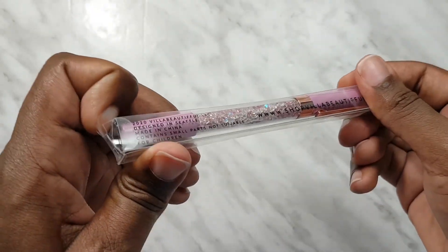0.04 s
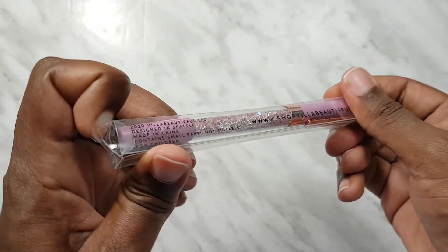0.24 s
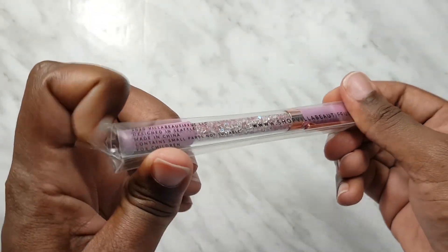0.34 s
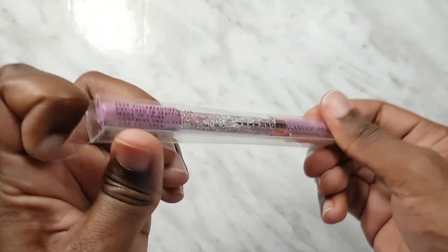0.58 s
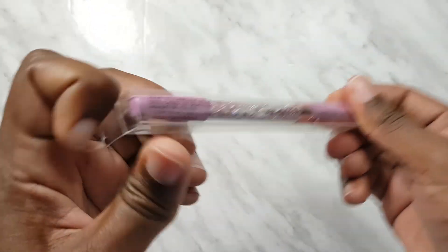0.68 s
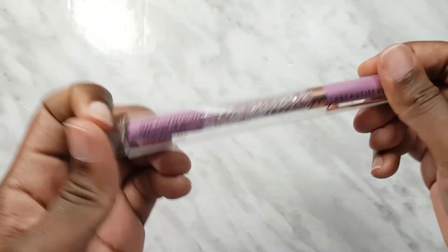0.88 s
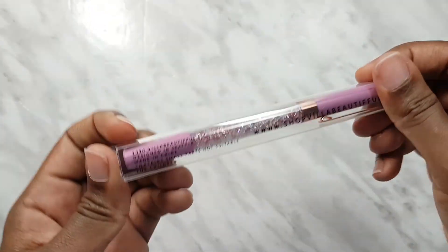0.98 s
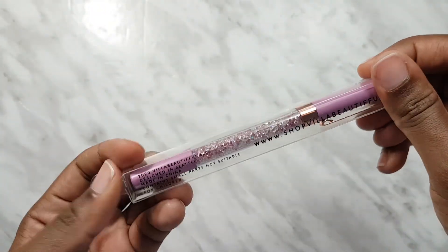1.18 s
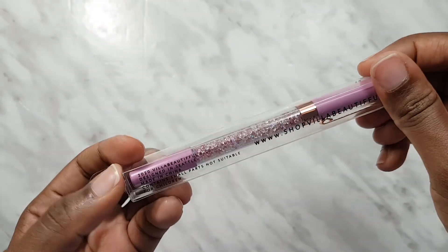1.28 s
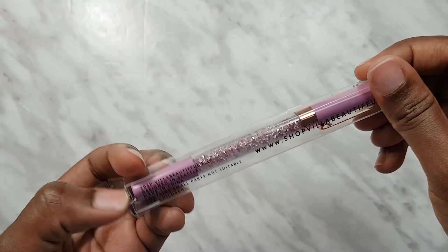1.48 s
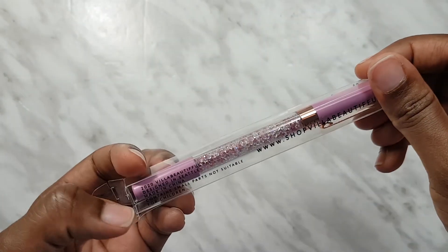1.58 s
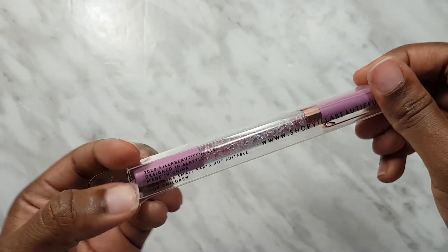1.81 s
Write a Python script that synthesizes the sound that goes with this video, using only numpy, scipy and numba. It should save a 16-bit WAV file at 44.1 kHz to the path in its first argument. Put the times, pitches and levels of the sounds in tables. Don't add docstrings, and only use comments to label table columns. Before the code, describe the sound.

Thin clear plastic pen box clicks sharply, its flap buckling and snapping free with a brief rattle

```python
import sys
import numpy as np
from scipy import signal
from scipy.fft import rfft, irfft
from scipy.io import wavfile
from scipy.ndimage import uniform_filter1d
from numba import njit

SR = 44100
rng = np.random.default_rng(int(sys.argv[2]) if len(sys.argv) > 2 else 0)


def ratio_of_db(decibels):
    return 10 ** (np.asarray(decibels, float) / 20)


def wav_out(sig):
    wavfile.write(sys.argv[1], SR, np.round(np.clip(np.atleast_2d(sig).T, -1, 1) * 32767).astype(np.int16))


N = 81585
PORT_LAG_S = 0.00016
LEFT_RIGHT = np.array([[0.5], [-0.5]])
BASS_PAN_DB = 4
ROOM_T60_S = 0.29


def unit(x):
    return x / np.sqrt(np.mean(x ** 2))


@njit
def svf(x, hz, width):
    y, band, low = np.empty(len(x)), 0., 0.
    for i in range(len(x)):
        g = np.tan(np.pi * hz[i] / SR)
        v = (band + g * (x[i] - low)) / (1 + g * (g + width))
        band, low = 2 * v - band, low + 2 * g * v
        y[i] = width * v
    return y


def noise_band(hz, width):
    return svf(rng.standard_normal(N), np.full(N, 1. * hz), width)


def walk(rate_hz):
    hold = int(SR / rate_hz)
    steps = np.repeat(rng.standard_normal(N // hold + 1), hold)
    return 0.33 * uniform_filter1d(uniform_filter1d(steps, hold), hold)[:N]


def add(out, x, start_s):
    for port in range(2):
        i = int((start_s + port * PORT_LAG_S) * SR)
        n = min(x.shape[1], N - i)
        out[port, i:i + n] += x[port, :n]


# frequency in Hz, density in dB per Hz.
HISS_SPECTRUM = [(200, -8.5), (320, -9), (740, -21.5), (2000, -24), (4500, -31.5), (9000, -43.5),
                 (14500, -33), (16000, -41)]
# centre in Hz, width in Hz, level in dB.
HUM_RESONANCES = [(54, 21, -74), (123, 44, -65.5), (137.5, 9.2, -69), (284.9, 43, -71)]
HISS_DB, SHARED_HZ = -66, 1500
DRONE_HZ, DRONE_DB, DRONE_ENDS_S = 480, -70.5, 0.6
EARLIER_CLICK_DB = -56.5


def air():
    t = np.arange(N) / SR
    f = np.maximum(np.arange(N // 2 + 1) * SR / N, 1)
    spectrum_hz, spectrum_db = np.array(HISS_SPECTRUM).T
    density = ratio_of_db(np.interp(np.log(f), np.log(spectrum_hz), spectrum_db))
    mid, side = rfft(rng.standard_normal((2, N))) * density
    side = side * np.clip(0.2 + f / SHARED_HZ, 0, 1)
    hiss = irfft(np.array([mid + side, mid - side]) * (f > 200), N)

    hum = 0
    for hz, width_hz, db in HUM_RESONANCES:
        shared, opposed = (
            svf(noise_band(hz, width_hz / hz), np.full(N, 1. * hz), 0.59) for _ in range(2))
        ports = unit(shared) + 0.24 * unit(opposed) * np.array([[1], [-1]])
        hum = hum + ratio_of_db(db + 2.0 * walk(1.7)) * ports
    drone = unit(noise_band(DRONE_HZ, 0.18)) * np.clip((DRONE_ENDS_S - t) * 10, 0, 1)
    hum = hum + ratio_of_db(DRONE_DB) * drone

    earlier = np.array([unit(noise_band(3000, 0.23)) for _ in range(2)])
    earlier = earlier * ratio_of_db(EARLIER_CLICK_DB - 60 * t / ROOM_T60_S)
    pan = ratio_of_db(LEFT_RIGHT * BASS_PAN_DB)
    hiss = unit(hiss) * ratio_of_db(HISS_DB + 3.1 * walk(10)) * pan ** 0.27
    return hiss + hum * pan + earlier


# frequency in Hz, left-right difference in dB.
PORT_SHADE = [(600, -0.5), (2300, -3), (3300, 0.5), (5000, 0), (8000, 7), (13000, 4.5)]
RISE_S, RADIATES_HZ, SAME_PHASE_HZ = 0.00014, 450, 1100
DETUNE_SHARE, SCATTER_DB, CHATTER_DB = 0.017, 1.17, -9


def ring(modes, lift_db, t, chatter_s):
    hz, db, t60_s = np.array(modes).T
    detune, polarity = rng.standard_normal((2, len(hz)))
    scatter = rng.standard_normal((2, len(hz)))
    spread = np.array([0.04, 1, 1, 1, 1])[:, None, None]
    delay_s = chatter_s * rng.random((5, len(hz), 1)) * spread
    age = np.maximum(t - delay_s, 0)
    waves = np.sin(2 * np.pi * (hz * (1 + DETUNE_SHARE * detune))[:, None] * age)
    waves = waves * ratio_of_db(-60 * age / t60_s[:, None]) * (1 - np.exp(-age / RISE_S))
    shared = waves[0] + ratio_of_db(CHATTER_DB) * (waves[1] - waves[2])
    own = ratio_of_db(CHATTER_DB) * (waves[3] - waves[4])

    shade_hz, shade_db = np.array(PORT_SHADE).T
    shade_db = np.interp(np.log(hz), np.log(shade_hz), shade_db) * LEFT_RIGHT
    gain = ratio_of_db(db + lift_db + shade_db + SCATTER_DB * scatter) * np.sign(polarity)
    phase = np.where(hz < SAME_PHASE_HZ, 1, np.array([[1], [-1]]))
    x = gain @ shared + gain * phase @ own
    return signal.lfilter(*signal.butter(2, RADIATES_HZ, "highpass", fs=SR), x)


# start in seconds, level in dB, low modes in dB, treble crack in dB, left-right in dB.
CLICKS = [
    (0.2266, -14, -3, -19, 8),
    (.2672, -13.5, 3, -16.5, 1.5),
]
BUCKLES = [
    (.3954, -17.5, 1, -3.5, 1.5),
    (.3972, -20, 3, -10, 4.5),
    (.3987, -14.5, -10.5, 1, 4.5),
    (.4010, -22, -4, -1.5, 2.5),
    (.4040, -24, -0.5, -5, 3.5),
    (.4065, -26, 1, -10, 2.5),
    (.4113, -26, -6.5, -4.5, 9),
]
SNAPS = [(.5464, -18.5, -13, 1, 2), (.5498, -11.5, 1, 1, 6.5), (.5520, -16, 0, -10.5, -5),
         (.5542, -17.5, -7, -17.5, 0), (.5572, -26, -0.5, -10.5, 5), (.5620, -23, -1, 0, 6),
         (.5665, -30, 2, 0.5, -2), (.5690, -27.5, 3, 2, 5.5), (.5746, -26, 6, 2, 2.5),
         (.5785, -35, 6, -0.5, 1), (.5816, -27.5, -2, 3.5, 2), (.5895, -33.5, -3.5, -4, 2.5),
         (.5970, -36, 6.5, 2, -10.5), (.7270, -50.5, 12, -1, 4)]
TICKS = [(.8812, -47, 2, -2.5, 2), (.9530, -58.5, 15, 3, 4), (0.978, -45, 7.5, -4.5, 1.5),
         (1.03, -55.5, -3, -5, 0), (1.2776, -54.5, 0, -5.5, 2), (1.6420, -59.5, 7.5, -3, 6),
         (1.703, -62.5, 10, -1, 4), (1.817, -53.5, 12, -3, 2), (1.8220, -57.5, -0.5, -12.5, 2),
         (1.8265, -51.5, -1, -6, 0), (1.8375, -53.5, 11, -5.5, 9.5)]
PATS = [
    (1.2474, -51, -4, -22, 6.5),
    (1.3518, -47, 1, -16, 6),
    (1.3534, -46, 6, -2, 9.5),
    (1.3590, -56, -3, -12, -6),
    (1.3628, -43, -2, -24, -8),
    (1.3672, -49, 8, -20, 5),
    (1.3722, -52.5, 2, -9, 1),
    (1.3790, -60, 0, -9.5, 2.5),
    (1.3890, -70, -10.5, -12, -7),
]
KNOCKS = [
    (1.7191, -33.5, -18, -15, 11),
    (1.7203, -31, 0.5, -3, 3),
]
# frequency in Hz, level in dB, t60 in seconds; the first three of a box are its low ones.
SHUT_BOX = [(540, -17, .008), (837.6, -6.5, 0.0094), (1410, -6, 0.024), (1690, -5, 0.014),
            (2400, -2.5, 0.01), (2812, 4, 0.0083), (3141, -3.5, .024), (3470, 6.5, 0.01), (4200, -2, .008),
            (5170, -13.5, 0.0042)]
BOX = [(604.3, -12.5, 0.008), (860, -10.5, 0.011), (1425, -3.5, 0.023), (1681, -6, 0.0056),
       (1967, -4, 0.025), (2360, 5.5, 0.0059), (2800, -1.5, 0.008), (3130, -3, 0.018), (3290, 2.5, 0.009),
       (4400, -2.5, 0.008), (5170, -13, 0.005)]
BENT_BOX = [(297.17, -13, 0.0063), (658, -10.5, .012), (833.3, -12.5, 0.021), (1300, -13, 0.0084),
            (1530, -15.5, 0.011), (2350, -9.5, 0.025), (2720, -4, 0.017), (3336, 3, .016),
            (3717, -6, 0.012327), (4367.8, -6.5, .008)]
OPEN_BOX = [(399.4, -17, .006), (608, -5, 0.0064), (1070, -11.5, 0.0045), (1500, -9.5, 0.014192),
            (1842.3, -3, 0.0049), (2268, 2.5, 0.0066), (3104, 3, 0.0072), (3500, -8.5, 0.029),
            (4310, -6.5, 0.0078)]
GRIPPED_BOX = [(512, -2.5, 0.0087), (770, -0.5, .012), (1040, -10, 0.004767), (1534, -4, 0.036),
               (2240, -2, .008), (3200, -4, 0.0066), (3965, -8, 0.00912)]
PEN = [(480, -33, 0.01023), (740, -10, 0.015), (1500, -15.5, 0.04), (2060, -2.5, 0.017), (2330, -16, 0.026),
       (3206, 5.5, 0.01), (3970, 1.5, 0.0054), (5700, 0, 0.0079), (6200, -4.5, 0.008)]
FLAP = [(5190, -1.5, 0.0086), (5770, -1, 0.0039), (7220, 2.5, 0.0023), (8545, -8, .007),
        (9500, -0.5, 0.0023), (11130, -8.5, 0.0046), (13350, -2.5, .006)]
BENT_FLAP = [(5126, -1, 0.0091), (6100, -3.5, .007), (7045, -7, .006), (8749, -2.5, 0.0094),
             (9380, -6.5, 0.0049), (10130, -5.5, 0.008), (11300, -4, .006), (12300, -4.5, 0.0069),
             (13900, -3.5, 0.0063), (15120, -11, .004)]
FREE_FLAP = [(5030, -9.5, 0.0058), (6333.4, -9, 0.0044), (7198.2, 3, 0.0021), (7463, 3, 0.0032),
             (8337.1, -6, 0.0059864), (9440, -6.5, 0.0046), (10516, -9, 0.0034), (10938, -12, 0.0017),
             (11900, -8, 0.0084), (13281, -3, 0.0033), (14300, -5, .004)]
CHATTER_S, SNAP_CHATTER_S, KNOCK_CHATTER_S = 0.0056, 0.0025, 0.002043
CRACK_DB, CRACK_S, CRACK_BAND_HZ = -6.5, 0.0018, [4350, 15000]
THUMP_HZ, THUMP_DB, THUMP_S = 156, -17, 0.004
THUMP_GROWTH, THUMP_REFERENCE_DB = 1.3, -11.5
SEND_S = 0.0004


def clicks():
    out, send, t = np.zeros((2, N)), np.zeros((2, N)), np.arange(1300) / SR
    thump = np.sin(2 * np.pi * THUMP_HZ * t) * np.exp(-t / THUMP_S)
    thump = signal.lfilter(*signal.butter(1, 60, "highpass", fs=SR), thump)
    thump = thump * ratio_of_db(LEFT_RIGHT * BASS_PAN_DB)
    crack_filter = signal.butter(1, CRACK_BAND_HZ, "bandpass", fs=SR)
    # hits, box modes, flap modes, chatter in s, air push
    kinds = [(CLICKS[:1], SHUT_BOX, FLAP, CHATTER_S, 0),
             (CLICKS[1:], BOX, FLAP, CHATTER_S, 0),
             (BUCKLES, BENT_BOX, BENT_FLAP, SNAP_CHATTER_S, 1),
             (SNAPS, OPEN_BOX, FREE_FLAP, SNAP_CHATTER_S, 1),
             (TICKS, BOX, FLAP, SNAP_CHATTER_S, 0),
             (PATS, GRIPPED_BOX, FLAP, KNOCK_CHATTER_S, 0),
             (KNOCKS, PEN, FLAP, KNOCK_CHATTER_S, 0)]
    for hits, modes, flap, chatter_s, push in kinds:
        for start_s, db, low_db, treble_db, pan_db in hits:
            crack = signal.lfilter(*crack_filter, rng.standard_normal((2, len(t))))
            crack = 2 * crack * np.exp(-t / CRACK_S)
            treble = ring(flap, 0, t, chatter_s) + ratio_of_db(CRACK_DB) * crack
            body = ring(modes, (np.arange(len(modes)) < 3) * low_db, t, chatter_s)
            thump_db = THUMP_DB + treble_db + THUMP_GROWTH * (db - THUMP_REFERENCE_DB)
            x = body + push * ratio_of_db(thump_db) * thump + ratio_of_db(treble_db) * treble
            x = 0.72 * x * ratio_of_db(db + pan_db * LEFT_RIGHT)
            add(out, x, start_s)
            front = unit(x * np.exp(-t / SEND_S))
            add(send, front * np.sqrt(np.mean(x ** 2)), start_s)
    return out, send


ROOM_DB, ROOM_TREBLE_T60_S, ROOM_START_S, ROOM_BASS_CUT_HZ = -13, 0.29, 0.0024, 820
PRESENCE_HZ, PRESENCE_DB, EARLY_DB, EARLY_T60_S = 3000, -9, 8.5, 0.022


def room(x):
    t = np.arange(int(0.5 * SR)) / SR
    echo = rng.standard_normal((2, len(t))) * np.clip(t / ROOM_START_S - 1, 0, 1)
    low = signal.lfilter([0.3], [1, -0.7], echo)
    bass = signal.lfilter([0.1], [1, -0.9], echo)
    low = low - bass + bass[0]
    treble = 0.21 * np.diff(echo, prepend=0)
    tail = low * ratio_of_db(-60 * t / ROOM_T60_S) + treble * ratio_of_db(-60 * t / ROOM_TREBLE_T60_S)
    presence = signal.lfilter(*signal.iirpeak(PRESENCE_HZ, 1.5, fs=SR), tail)
    tail = tail + ratio_of_db(PRESENCE_DB) * presence
    tail = tail * (1 + ratio_of_db(EARLY_DB - 60 * t / EARLY_T60_S))
    tail = tail / np.sqrt(np.sum(tail ** 2, axis=1, keepdims=True))
    x = signal.lfilter(*signal.butter(1, ROOM_BASS_CUT_HZ, "highpass", fs=SR), x)
    return ratio_of_db(ROOM_DB) * signal.fftconvolve(x, tail, axes=1)[:, :N]


def grit(n, grain_db):
    return rng.standard_normal((2, n)) * ratio_of_db(grain_db * rng.exponential(1, n))


RATTLE_S, RATTLE_DB, RATTLE_T60_S, RATTLE_HZ, RATTLE_GRAIN_DB = 0.552, -31.5, 0.27, 2800, 3.5


def rattle():
    out, t = np.zeros((2, N)), np.arange(8000) / SR
    hz = np.full(len(t), 1. * RATTLE_HZ)
    x = np.array([svf(g, hz, 1.8461) for g in grit(len(t), RATTLE_GRAIN_DB)])
    add(out, unit(x) * ratio_of_db(RATTLE_DB - 60 * t / RATTLE_T60_S + 5 * LEFT_RIGHT), RATTLE_S)
    return out


# start in seconds, length in seconds, level in dB, start pitch in Hz,
# end pitch in Hz, width as share of pitch.
SLIDES = [(0.695, 0.025, -56.5, 900, 700, 1), (0.908, 0.038, -66.5, 12430, 11450, 0.33),
          (0.94, 0.03, -60, 3700, 2800, 0.65), (0.956, 0.019, -76, 1420, 1410, 0.061),
          (1.104, 0.049, -72.5, 12900, 12100, 0.72), (1.111, 0.028, -67.5, 10000, 4500, 0.51),
          (1.13, 0.0087, -57.5, 3300, 2600, 0.16), (1.133, 0.018, -68, 1900, 1560, 0.23),
          (1.128, 0.018, -66, 5500, 3500, 0.45), (1.199, 0.02494, -68.5, 3100, 2968, 0.793),
          (1.244, 0.011, -62, 1020, 966.4, 0.093), (1.262, 0.009, -64, 3500, 7000, 1),
          (1.26, 0.011, -75, 12500, 12000, .4), (1.349, 0.029, -65, 7600, 1500, 1),
          (1.35, 0.036, -65, 1680, 1620, 0.14), (1.356, 0.018, -58, 450, 430, 0.16)]
SLIDE_GRAIN_DB = 2
SQUEAK_S, SQUEAK_LENGTH_S, SQUEAK_HZ, SQUEAK_DB, SQUEAK_TONE_DB = 1.425, 0.125, 3880, -80, -78


def slides():
    out = np.zeros((2, N))
    squeak = (SQUEAK_S, SQUEAK_LENGTH_S, SQUEAK_DB, SQUEAK_HZ, SQUEAK_HZ, 0.025)
    for start_s, length_s, db, from_hz, to_hz, width in SLIDES + [squeak]:
        u = np.linspace(0, 1, int(length_s * SR))
        hz = from_hz * (to_hz / from_hz) ** u
        x = np.array([svf(svf(g, hz, width), hz, width) for g in grit(len(u), SLIDE_GRAIN_DB)])
        swell = np.sin(np.pi * u) ** (0.3 if length_s > 0.08 else 1)
        add(out, unit(x) * swell * ratio_of_db(db), start_s)
    age = np.arange(int(SQUEAK_LENGTH_S * SR)) / SR
    tone = np.sin(2 * np.pi * SQUEAK_HZ * age) * np.sin(np.pi * age / SQUEAK_LENGTH_S) ** 0.3
    add(out, np.array([[1], [-0.5]]) * tone * ratio_of_db(SQUEAK_TONE_DB), SQUEAK_S)
    return out


def scene():
    hits, send = clicks()
    skin = slides()
    return air() + hits + room(send + skin) + rattle() + skin


def band_limit(x):
    return signal.sosfilt(signal.butter(12, 16520, fs=SR, output="sos"), x)


TOP_HZ, OFFSET = 15700, -0.00043


def record(dry):
    top_cut = signal.ellip(8, 0.2, 60, TOP_HZ, fs=SR, output="sos")
    mix = np.clip(signal.sosfilt(top_cut, dry) + OFFSET, -1, 1)
    return band_limit(mix)


dry = scene()
out = record(dry)
wav_out(out)
```